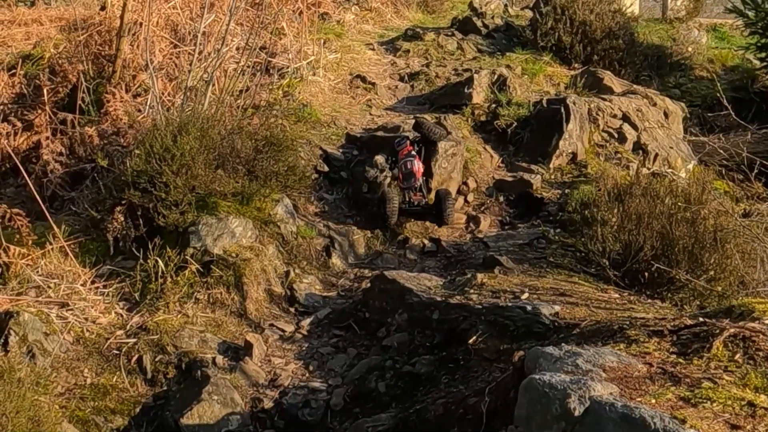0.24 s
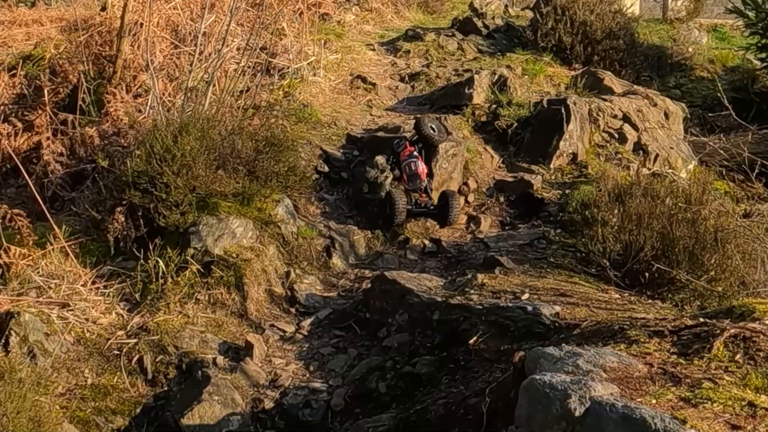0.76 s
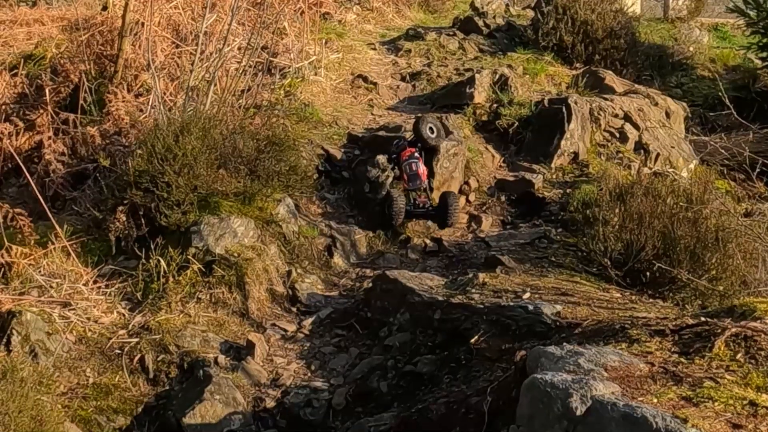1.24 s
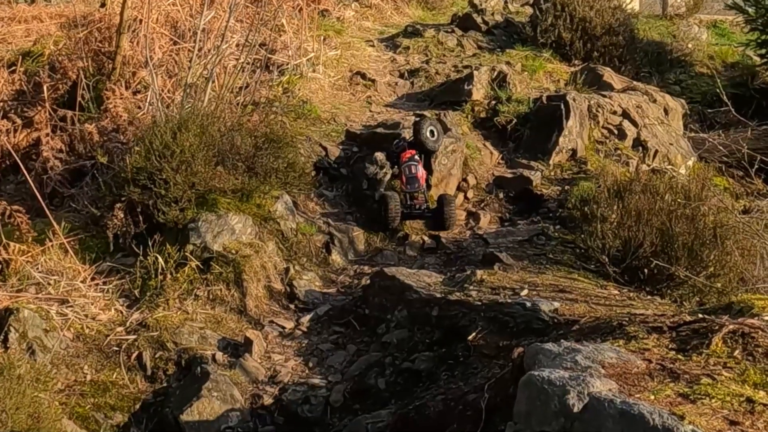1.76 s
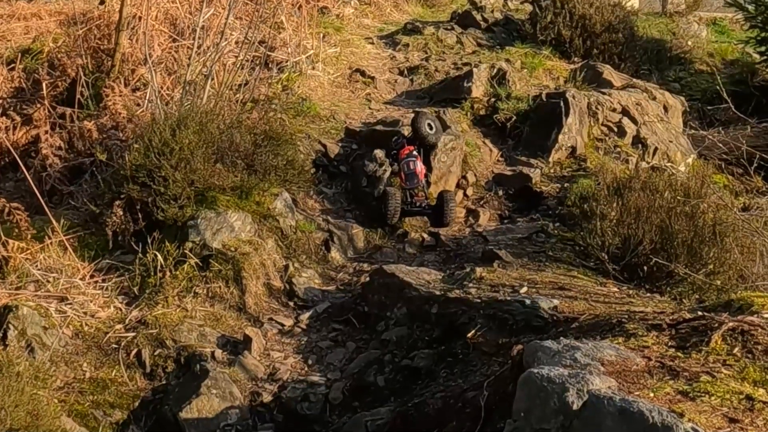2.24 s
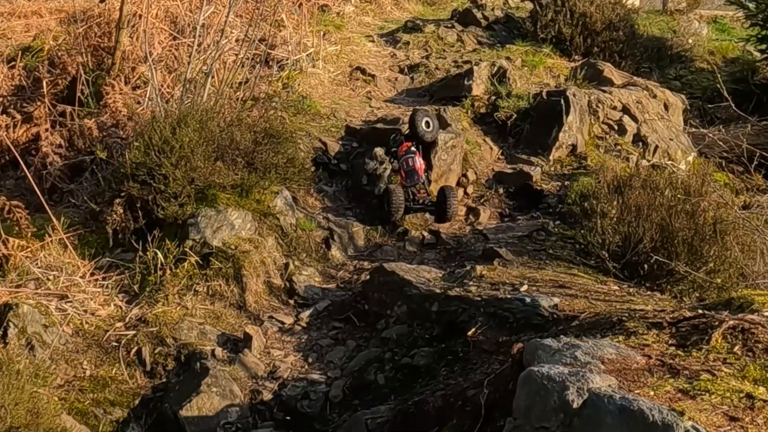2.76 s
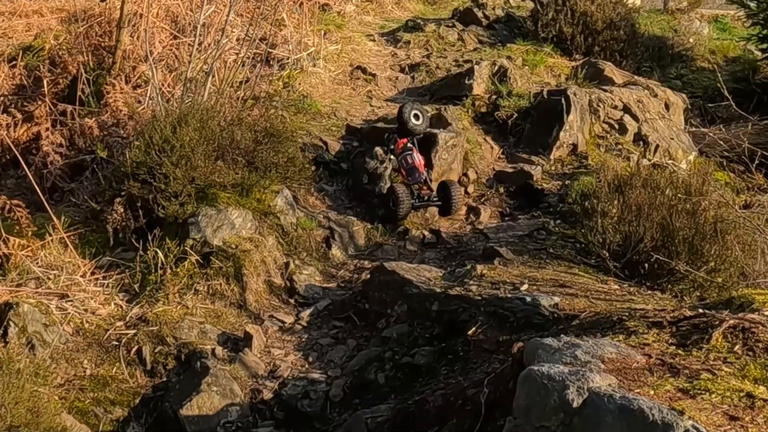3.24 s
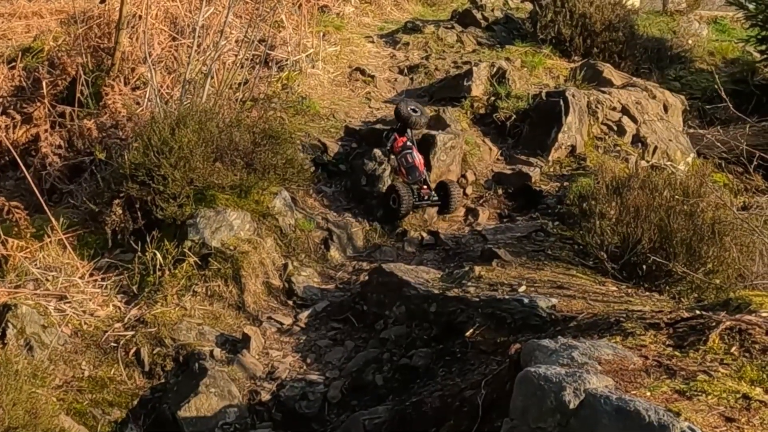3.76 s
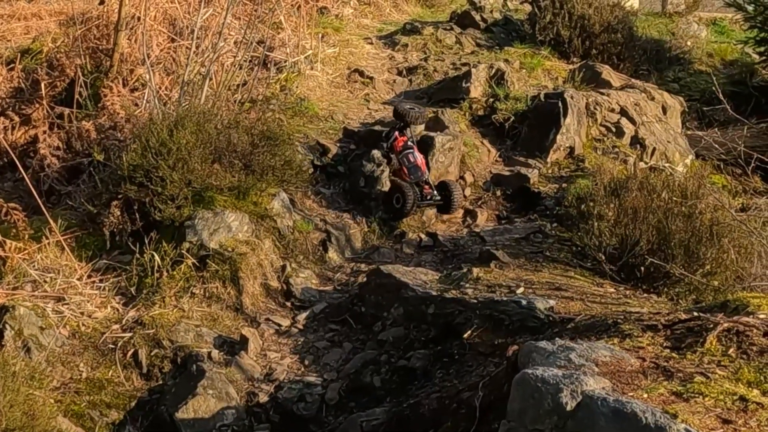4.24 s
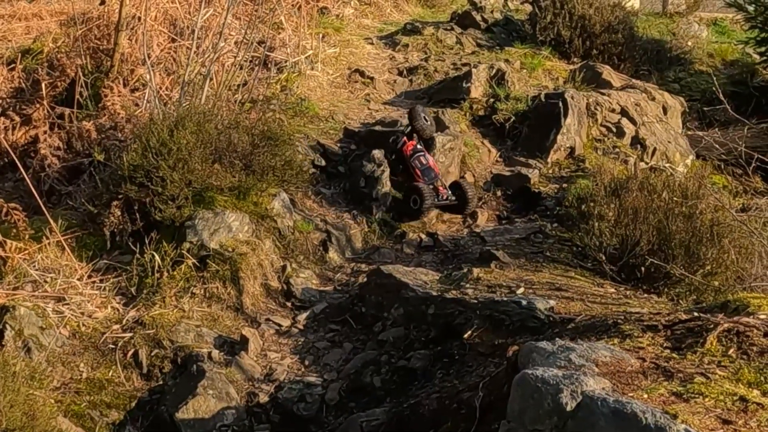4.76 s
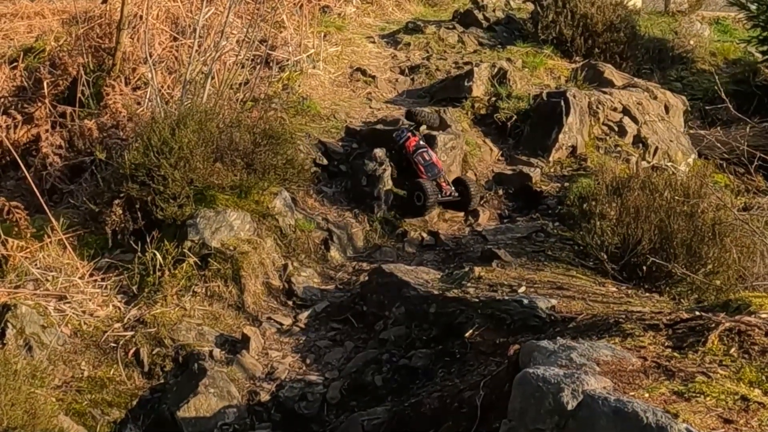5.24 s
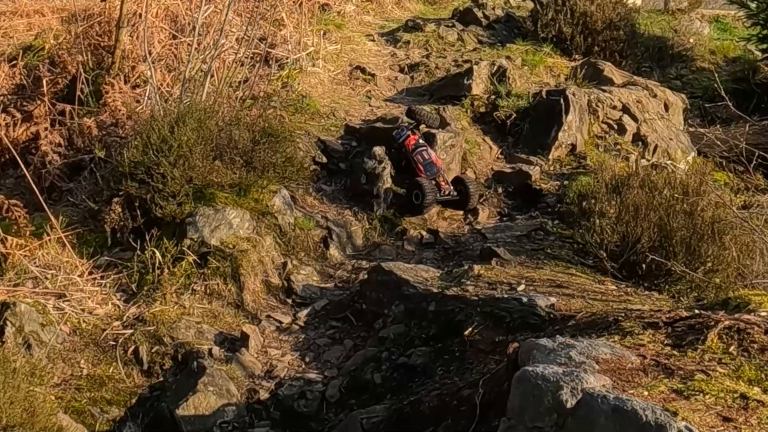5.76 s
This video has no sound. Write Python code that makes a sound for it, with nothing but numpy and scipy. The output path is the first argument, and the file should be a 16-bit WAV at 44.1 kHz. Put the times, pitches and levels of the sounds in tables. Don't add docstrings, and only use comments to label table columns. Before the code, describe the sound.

A toy electric crawler grinds and whines in short bursts over rocks, tyres clicking and thumping, with small birds whistling and wind buffeting.

```python
import sys
import numpy as np
from scipy import signal
from scipy.fft import rfft, irfft, next_fast_len
from scipy.io import wavfile
from scipy.ndimage import uniform_filter1d, map_coordinates

SR = 44100
rng = np.random.default_rng(int(sys.argv[2]) if len(sys.argv) > 2 else 0)


def transcribe(u):
    v = np.clip(np.atleast_2d(u).T, -1, 1)
    q = np.round(v * 32767).astype(np.int16)
    wavfile.write(sys.argv[1], SR, q)


def volts(x):
    e = np.asarray(x, float) / 20
    return 10 ** e


N = 264732


def unit(x):
    return x / np.sqrt(np.mean(x ** 2) + 1e-20)


def along(points, hz):
    f, v = np.transpose(points)
    return np.interp(np.log(hz + 1), np.log(f + 1), v)


def curves(rows):
    s, *cols = np.transpose(sorted(rows))
    return [np.interp(np.arange(N) / SR, s, c) for c in cols]


def bursts(tables, edge):
    t = np.arange(N) / SR
    gates = [np.clip(np.minimum(t - rows[0][0], rows[-1][0] - t) / edge + 1, 0, 1) for rows in tables]
    return np.max(gates, 0), *curves([tuple(row) for rows in tables for row in rows])


def wobble(rate):
    return map_coordinates(rng.standard_normal(int(N * rate / SR) + 4), [np.arange(N) * rate / SR])


def filtered(x, response):
    m = next_fast_len(N + SR // 2)
    return irfft(rfft(x, m) * response(np.fft.rfftfreq(m, 1 / SR)), m)[..., :N]


def noise(spectrum, channels=1):
    return unit(filtered(rng.standard_normal((channels, N)), lambda hz: volts(along(spectrum, hz))))


def spread(spectrum, side_db):
    mid, side = noise(spectrum, channels=2)
    return np.array([mid + volts(side_db) * side, mid - volts(side_db) * side])


def resonant(modes):
    def response(f):
        total = 0
        for k, (centre, width, db) in enumerate(modes):
            loss = 1j * f * width
            total = total + (-1) ** k * volts(db) * loss / (centre * centre - f * f + loss)
        return total
    return response


def turning(hz):
    return 2 * np.pi * np.cumsum(hz) / SR


def swells(rows, rise, fall, base_db):
    s, hold, db, climb_db = np.transpose(rows)[..., None]
    t = np.arange(0, N / SR + .001, .001)
    flanks = rise * np.maximum(s - t, 0) + fall * np.maximum(t - s - hold, 0)
    climb = climb_db * np.clip(1 - (t - s) / hold, 0, 1)
    power = volts(2 * (db - climb - flanks)).sum(0)
    return 10 * np.log10(volts(2 * base_db) + np.interp(np.arange(N) / SR, t, power))


# frequency in Hz, level in dB per Hz.
FAR = [(53, -26), (90, -21), (140, 1), (205, 5), (339, -3.5), (790, -5.5), (1360, 1.5), (3570, -21),
       (4820, -22.5), (6390, -23.5), (9000, -41), (11000, -33), (14300, -58), (22000, -120)]
# time in seconds, change in dB.
FAR_DRIFT = [(0, 0), (1, 1), (2, 0), (2.7, 0), (3.5, -0.5), (4.3, 0), (5.1, 0), (5.8, -1.5), (6, 2)]
FAR_DB, FAR_SWAY_DB = -59.5, 1.1


def far_hum():
    level_db = FAR_DB + curves(FAR_DRIFT)[0] + FAR_SWAY_DB * wobble(5.21)
    return volts(level_db) * spread(FAR, side_db=-5.0)


# frequency in Hz, level in dB per Hz.
BUFFET = [(12, -5), (25, -0.5), (45, -4), (70, -18.5), (100, -36), (160, -28), (300, -46), (500, -120)]
# frequency in Hz, level in dB per Hz.
FLAP = [(30, 0.5), (60, 7), (90, 7), (140, -3.5), (250, -20), (500, -120)]
# time in seconds, level in dB.
BREEZE = [(0, -42), (.33, -59.5), (.6, -51), (1.05, -59.5), (1.74, -60), (2.1, -49.5), (3.3, -49.5),
          (3.46, -75), (3.8, -38.5), (4.23, -58.5), (4.46, -56.5), (5.0, -40.5), (5.6, -38), (6, -48)]
# start in seconds, hold in seconds, level in dB.
PUFFS = [(0, 0.039, -35), (0.429, 0.014, -39), (0.537, 0.043, -40.5), (0.797, .03, -39.5),
         (1.793, 0.068, -51), (2.08, 0.034, -44.5), (2.443, 0.02355, -41), (2.566, 0.012, -49),
         (2.694, 0.049, -47), (3.023, 0.071, -45.5), (3.38, 0.029, -45.5), (3.569, 0.029, -41.5),
         (3.718, 0.2, -35), (4.33, .03, -52), (4.701, 0.047, -42), (4.96, 0.046, -36.5),
         (5.282, 0.058, -54), (5.495, 0.018, -34), (5.694, 0.082, -35), (5.838, 0.059, -37.5),
         (5.969, 0.027, -40)]
PUFF_RISE_DB_PER_S, PUFF_FALL_DB_PER_S = 224, 226


def wind():
    puffs = [(*row, 0) for row in PUFFS]
    gust_db = swells(puffs, PUFF_RISE_DB_PER_S, PUFF_FALL_DB_PER_S, curves(BREEZE)[0])
    lumps = unit(volts(2.6 * wobble(35)))
    slow = volts(gust_db) * spread(BUFFET, side_db=-6.5)
    fast = volts(1.95 * (gust_db + 39.5) - 49 + 1.8 * wobble(24.95)) * spread(FLAP, side_db=-17)
    push = lumps * (slow + fast)
    top = volts(gust_db + 8)
    rounded = push / (1 + (push / top) ** 2) ** .5
    push = filtered(rounded, lambda hz: 1 / (1 + (hz / 190) ** 6))
    return push * volts([[-1.9], [1.5]])


# frequency in Hz, level in dB per Hz.
HAZE = [(3800, -30), (4800, -4), (6000, 0), (7200, -4), (8300, -30), (22000, -120)]
# start in seconds, hold in seconds, level in dB, climb in dB.
CHATTER = [
    (.92, .15, -76, 0),
    (1.56, .35, -72, 0),
    (2.45, .3, -73, 0),
    (2.8, .4, -72, 0),
]


def flock():
    return volts(swells(CHATTER, 120, 70, -120) + 2.5 * wobble(25)) * spread(HAZE, side_db=-6)


# start in seconds, length in seconds, start pitch in Hz, end pitch in Hz, level in dB.
BIRDS = [(.11, .05, 3750, 3700, -80), (.39, .02, 5200, 2500, -73), (.92, .05, 5000, 5000, -74),
         (.98, .08, 5600, 5550, -76), (1.03, .09, 4750, 4700, -68), (1.34, .035, 3800, 5800, -73),
         (1.39, .02, 4700, 2800, -70), (1.555, .025, 6800, 6300, -64), (1.585, .025, 6300, 7300, -66),
         (1.635, .025, 7300, 6000, -65), (1.655, .042, 5100, 3300, -60), (1.695, .09, 6700, 6950, -79),
         (1.79, .1, 7000, 7150, -76), (1.81, .035, 7700, 8200, -76), (1.793, .015, 4200, 7000, -72),
         (2.4, .12, 5200, 5100, -68), (2.5, .12, 5600, 5500, -67), (2.525, .16, 4850, 4740, -68),
         (2.67, .15, 4800, 4600, -70), (.485, .03, 7900, 8500, -80), (2.47, .3, 5150, 5020, -72),
         (2.815, .12, 5900, 5550, -73), (2.93, .21, 5500, 4250, -66), (2.95, .12, 5500, 4500, -70),
         (2.85, .09, 4170, 4150, -85), (2.89, .14, 2920, 2880, -80), (4.2, .06, 2900, 2900, -76),
         (4.35, .035, 6500, 6550, -77)]
GLIDE_S = .03


def birds():
    out = np.zeros((2, N + SR))
    tremble, flutter = wobble(220), wobble(90)
    for s, length, from_hz, to_hz, db in BIRDS:
        t = np.arange(round(length * SR)) / SR
        at = round(s * SR)
        glide = to_hz + (from_hz - to_hz) * np.exp(-t / GLIDE_S)
        hz = glide * (1 + .012 * tremble[at:][:len(t)])
        level_db = db + 3 - 7 * t / length + 3 * flutter[at:][:len(t)]
        shape = np.sin(np.pi * t / length) ** .5 * volts(level_db)
        deep = int(length > .11)
        out[deep, at:][:len(t)] += shape * np.sin(turning(hz))
    return out[:, :N]


# frequency in Hz, level in dB.
ROCKS = [(150, 0), (350, -18), (1000, 1), (3500, 2), (9000, 4.5), (13000, 3)]


def echoes(x, t60):
    t = np.arange(SR // 2) / SR
    tail = rng.standard_normal((2, len(t))) * volts(-60 * t / t60) * (t > .004)
    wet = signal.fftconvolve(x[None], tail / np.linalg.norm(tail[0]), axes=1)[:, :N]
    return filtered(wet, lambda hz: volts(along(ROCKS, hz)))


# frequency in Hz, width in Hz, level in dB.
PLATE = [(1404, 130, 7.5), (2330, 430, -0.5), (4090, 370, 5.5), (5000, 800, -10), (6250, 180, -20.5)]
# start in seconds, hold in seconds, level in dB, climb in dB.
SCRAPES = [(.008, 0.032, -49, 0), (.05, 0.027, -55, 9), (.24, .05, -58.5, 1.5), (.322, 0.0099, -52.5, -2),
           (1.225, 0.037, -53.5, -4.5), (1.283, 0.015, -46, 4), (1.452, 0.08, -53, 1),
           (1.565, 0.048, -58, -9), (2.142, 0.023, -46.5, 5), (2.185, 0.011, -57, 1.5),
           (2.388, .01, -57, -1), (5.36, .1, -56, -5.5)]
SCRAPE_EDGE_DB_PER_S = 902


def scrapes():
    grit = volts(4 * wobble(900) + 1.5 * wobble(120)) * rng.standard_normal(N)
    level_db = swells(SCRAPES, SCRAPE_EDGE_DB_PER_S, SCRAPE_EDGE_DB_PER_S, -120)
    return volts(level_db) * unit(filtered(grit, resonant(PLATE)))


# frequency in Hz, width in Hz, level in dB.
SHELL = [(165.5, 64, -8.5), (238, 28.3, -5), (370.6, 63, -2), (710, 5.4, -9)]
# start in seconds, peak in dB, ring in Hz, shell knock in dB, crack in dB.
CLICKS = [(0.162, -28, 3830, -26, -24), (0.16, -41, 5900, -20, -18), (0.38, -45, 6300, -20, -12),
          (0.9798, -36.5, 2100, -9, -10), (1.0516, -38, 4770, -12, -13), (1.37, -43.5, 6000, -15, -4),
          (1.4, -42, 4000, -24, -10), (2.3881, -31, 4900, -33, -6), (2.755, -38.5, 3100, -5, -13),
          (2.8922, -37.5, 2800, -9, -15), (3.0734, -34, 1720, 15, -14), (3.187, -33.5, 2300, 5, -25),
          (3.232, -35, 2900, -16, -14), (3.263, -31, 2040, -6, -21), (3.3356, -37.5, 2600, 10, -26),
          (3.5597, -52, 7450, -10, 5), (3.8432, -48, 6940, 20, -21), (4.2082, -49, 2900, 13, -23),
          (4.433, -38, 3700, -6, -22), (4.262, -23.5, 2070, 5.5, -12.5), (4.304, -35, 1750, -7, -12),
          (5.14, -37, 4000, -22, -5), (4.912, -43, 6000, -19, -3), (5.872, -52, 9500, -19, -2),
          (3.59, -50, 9000, -19, 0), (3.603, -50, 11000, -19, 0), (1.305, -44, 5000, -15, -10),
          (0.398, -50, 9000, -19, 0), (0.5, -51, 9000, -19, 0), (5.954, -35.5, 1761, 19, -27)]
RING_T60_S, CRACK_T60_S = .006, .013


def clicks():
    out, knocks = np.zeros(N + SR), np.zeros(N)
    t = np.arange(SR // 20) / SR
    for s, db, hz, knock_db, crack_db in CLICKS:
        at = round(s * SR)
        rise = .0004 * volts(.9 * (-20 - db))
        grains = uniform_filter1d(rng.standard_normal(len(t)), size=3)
        crack = volts(crack_db + 6.5 - 60 * t / CRACK_T60_S) * grains
        low_mode = (0.42 + (hz < 3100)) * np.sin(2 * np.pi * 1430 * t)
        ring = volts(-60 * t / RING_T60_S) * (np.sin(2 * np.pi * hz * t) + low_mode)
        out[at:][:len(t)] += volts(db + 0.5) * (crack + ring) * (1 - np.exp(-t / rise))
        knocks[at] = volts(db + knock_db + 29.0)
    narrow_shell = [(c, 0.57 * w, db) for c, w, db in SHELL]
    return out[:N] + filtered(knocks, resonant(narrow_shell))


# time in seconds, peak in dB.
THUMPS = [(0.298, -44), (0.298, -37), (1.086, -45), (1.119, -41), (1.182, -50), (1.183, -37), (1.216, -24),
          (1.462, -36.5), (1.535, -33), (1.62, -37.5), (1.872, -37), (1.93, -34), (1.954, -22),
          (2.839, -41.5), (2.903, -51), (3.075, -47), (3.161, -40), (3.338, -55), (3.837, -43),
          (4.241, -43), (4.264, -33), (4.499, -43), (4.54, -43), (4.557, -36), (4.639, -29), (4.683, -25.5),
          (4.727, -34), (4.727, -31), (4.97, -39), (5.021, -29.5), (5.174, -42), (5.197, -33),
          (5.247, -24.5), (5.292, -23.5), (5.402, -21), (5.438, -28), (5.478, -25), (5.532, -21),
          (5.625, -33), (5.628, -28), (5.654, -28), (5.697, -31.5), (5.866, -40), (5.923, -28.5),
          (5.954, -25)]
THUMP_DB = 42


def thumps():
    at = [round(s * SR) for s, db in THUMPS]
    jolts = np.bincount(at, [volts(db + THUMP_DB) for s, db in THUMPS], N)
    return filtered(jolts, lambda f: resonant(SHELL)(f) / (1 + 1j * f / 700) ** 2)


# frequency in Hz, level in dB.
HOUSING = [(2500, -20.5), (3700, -5), (4300, -20.5), (5000, -1.5), (7700, 0.5), (8600, -10.5),
           (9400, -11.5), (11200, -2.5), (12000, -17)]
# frequency in Hz, level in dB per Hz.
HISS = [(1760, -26), (3000, -3.5), (3950, 0.5), (4390, 1.5), (5040, 1.5), (6770, 5), (7620, 6.5),
        (8740, -9), (11100, 4.5), (13400, -6), (14400, -25)]
# time in seconds, mesh in Hz, whine in dB.
FLICKS = [
    [(0.553, 1018, -72), (0.566, 1228, -51), (0.588, 1935, -53), (0.63, 2010, -83)],
    [(2.315, 940.3, -61), (2.334, 1335, -53), (2.366, 2010, -48), (2.38, 1934, -51), (2.432, 1834, -82)],
    [(2.44, 1960, -85), (2.52, 1840, -83)],
    [(3.806, 1407, -83), (3.83, 1400, -74)],
    [(4.528, 1800, -85), (4.55, 1798, -85)],
    [(4.94, 1510, -63), (4.98, 1730, -93)],
    [(5.01, 1700, -85.5), (5.048, 1669, -91)],
    [(5.112, 1298, -90), (5.125, 1311, -90)],
    [(5.15, 1284, -81), (5.2, 1624, -78)],
    [(5.232, 1698, -70), (5.245, 1776, -57), (5.27, 1859, -46.5), (5.285, 1815, -49), (5.302, 1533, -59),
     (5.32, 1543, -61)],
    [(5.52, 1499, -90), (5.532, 1502, -90)],
]
# time in seconds, mesh in Hz, whine in dB.
SWEEPS = [
    [(3.593, 1457, -76), (3.615, 1510, -55), (3.634, 1800, -52), (3.646, 1787, -44), (3.684, 1890, -49.5),
     (3.72, 1820, -42), (3.758, 1556, -48.5), (3.78, 1184, -49.5), (3.794, 1025, -56)],
    [(3.845, 902, -55.5), (3.865, 1132, -52.5), (3.888, 1155, -52.5), (3.914, 1357, -48.5),
     (3.942, 1420, -47), (4.012, 1363, -50.5), (4.039, 1113, -53), (4.075, 965, -62)],
]
# time in seconds, mesh in Hz, whine in dB.
PUSHES = [
    [(0.66, 1845, -72), (0.686, 2022, -46), (0.724, 1978, -39.5), (0.756, 1840, -47), (0.79, 1624, -42),
     (0.806, 1510, -43), (0.816, 1406, -47)],
    [(0.821, 1314, -44), (0.838, 1316, -51), (0.845, 1097, -45), (0.856, 1110, -50), (0.864, 1033, -54),
     (0.885, 1120, -50), (0.902, 960, -59), (0.912, 987, -61)],
    [(2.03, 1034, -53), (2.053, 1110, -54), (2.07, 1062, -51.5), (2.097, 1328, -49.5), (2.11, 1230, -50),
     (2.138, 1330, -49), (2.178, 1175, -52), (2.207, 1135, -54), (2.228, 1125, -54)],
    [(4.575, 1922, -70), (4.59, 1984, -51), (4.618, 1968, -47.5), (4.66, 1795, -51), (4.672, 1792, -51),
     (4.682, 1658, -48), (4.7, 1626, -49)],
    [(4.71, 1420, -51), (4.734, 1430, -55), (4.766, 1293, -54), (4.816, 1413, -53.5), (4.83, 1260, -54),
     (4.85, 1220, -52), (4.885, 1250, -62)],
]
BRUSH_DB = [-48.5, -47.5, -57, -54, -64, -47.5, -50.5, -60, -49, -48, -49, -51.5, -56, -52.5, -53, -52, -47,
            -48, -49]
BRIGHT_DB = [-5, 2.5, -3, -3, 0, 1, -4.5, -4, -3, -2.5, 0, 2, -1.8, -9, -9, -4, 3, -1.5]
SWING = [.1, .1, .1, .1, .1, .1, .1, .1, .1, .1, .1, .17, .13, .06, .12, .12, .06, .12]
FOLD_HZ = 24000
PINION_TEETH = 7.7
BRUSH_DB_PER_OCTAVE, SPUTTER_DB = 7, 1.8


def servo():
    settings = zip(FLICKS + SWEEPS + PUSHES, BRUSH_DB, BRIGHT_DB, SWING)
    moves = [[(s, hz, db, brush_db, rows in PUSHES, bright_db, swing) for s, hz, db in rows]
             for rows, brush_db, bright_db, swing in settings]
    gate, hz, tone_db, brush_db, wedged, bright_db, swing = bursts(moves, edge=0.022)
    hiss_db = brush_db + BRUSH_DB_PER_OCTAVE * np.log2(hz / 2000)
    load = np.clip(2000 / hz - 1, 0, 1)
    jitter = (.002 + .006 * load) * wobble(200)
    strain = load * wedged * (.012 * wobble(250) + .005 * wobble(60))
    hz = uniform_filter1d(hz, size=220) * (1 + jitter + strain)
    phase, fold = turning(hz), turning(np.full(N, FOLD_HZ))
    phase = phase + swing * np.sin(phase / PINION_TEETH)
    comb = 0
    for k in range(2, 14):
        tone_hz = k * hz
        colour_db = along(HOUSING, tone_hz) + bright_db * np.log2(tone_hz / 6000)
        loss_db = 10 * load * (k < 4) + 12 * wedged * np.clip(4 * load - 1.6, 0, 1) * (tone_hz < 4250)
        flicker_db = (1.8 + 2.5 * load * wedged) * wobble(80)
        size = volts(colour_db - loss_db + flicker_db) * (tone_hz < FOLD_HZ / 2)
        mirror = volts(-5 - ((FOLD_HZ / 2 - tone_hz) / 480) ** 2)
        comb = comb + size * (np.sin(k * phase + k * k) + mirror * np.sin(fold - k * phase))
    hiss = volts(1.5 * wobble(230) + SPUTTER_DB * wobble(30)) * noise(HISS)[0]
    return gate ** 2 * (volts(tone_db) * comb + volts(hiss_db - 4.0) * unit(hiss))


# start in seconds, hold in seconds, shell rumble at the end in dB,
# climb over the hold in dB, gear grind over rumble in dB.
PULLS = [(0, 0.034, -48.5, 26, -2.5), (0.262, 0.076, -39.5, 11, -16.5), (0.652, 0.13, -79.5, -15, 10.5),
         (1.123, 0.1, -33, 9.5, -16.5), (1.308, 0.017, -48, 10, -7.5), (1.371, 0.25, -37, 24, -15.5),
         (1.868, 0.13, -31.5, 9.5, -15.5), (2.069, 0.15, -56.5, 3, -13), (2.156, 0.042, -64, 10, 7),
         (2.379, 0.063, -75, -6, 10.5), (2.722, 0.2, -53, 6, -16.5), (3.072, 0.0092, -44.5, 10, -12),
         (3.114, 0.22, -50.5, -2, -12.5), (3.613, 0.15, -55.5, 4, -7.5), (3.838, 0.025, -46.5, 11, -20),
         (3.916, 0.119, -61.5, 5, -7.5), (4.276, 0.085, -53, -14.5, -14), (4.39, 0.077, -62.5, -7, -25),
         (4.554, 0.29, -30, 8, -23), (4.947, 0.058, -41.5, 4.5, -17.5), (5.239, 0.43, -34, -4.5, -20.5),
         (5.658, 0.014, -33, 13, -44), (5.9, 0.085, -27.5, 14.5, -24)]
# time in seconds, mesh in Hz.
DRIVE = [
    [(0.25, 700), (0.3, 655.5), (0.36, 687)],
    [(1.1, 529), (1.146, 680), (1.18, 734), (1.21, 826), (1.26, 793)],
    [(1.45, 490), (1.48, 555), (1.52, 555), (1.562, 480), (1.59, 485)],
    [(1.87, 600.4), (1.9, 680), (1.924, 800.6), (1.945, 829), (1.969, 999), (1.987, 776), (2.012, 775),
     (2.03, 630)],
    [(4.61, 652), (4.628, 630.9), (4.668, 699), (4.72, 555), (4.81, 717), (4.864, 574.6), (4.88, 495.3)],
    [(4.94, 794), (4.98, 983), (5.0, 738), (5.04, 673)],
    [(5.21, 607.5), (5.236, 746.4), (5.26, 914), (5.285, 928), (5.305, 811), (5.35, 823), (5.4, 1033),
     (5.44, 936)],
    [(5.46, 847), (5.486, 757), (5.54, 929), (5.578, 884), (5.608, 749), (5.69, 719)],
    [(5.9, 698), (5.968, 841), (5.984, 758), (6.0, 760)],
]
SING_DB = [-1, 1, 2, 1, -4.5, -6, -2.5, -2.5, -5]
# frequency in Hz, level in dB per Hz.
GRIND = [(290, -56), (500, -10), (1020, 2), (1180, -7), (1580, -0.5), (2070, -6), (2350, -5), (3480, -11.5),
         (5160, -10), (11000, -30), (14400, -31.5)]
# multiple of the mesh frequency, level in dB.
TEETH = [(1, -8), (2, 1.5), (3, -1.5), (4, -8), (5, -9), (6, -8), (7, -15), (8, -16)]
# frequency in Hz, level in dB.
GEARBOX = [(950, -6), (1450, 4), (1700, 1), (1950, -6), (2400, 2), (3000, 0), (3350, -4), (3800, 3),
           (4500, -1), (6000, -6)]
SPIN_UP_DB_PER_S, COAST_DB_PER_S, IDLE_DB, IDLE_GRIND_DB = 251, 294, -82, -93
MESH_DB, MESH_EDGE_S = 2.5, .011


def drive():
    rumbles = [row[:4] for row in PULLS]
    grinds = [(s, hold, db + over, climb / 2) for s, hold, db, climb, over in PULLS]
    rumble_db = swells(rumbles, SPIN_UP_DB_PER_S, COAST_DB_PER_S, IDLE_DB)
    grind_db = swells(grinds, SPIN_UP_DB_PER_S, COAST_DB_PER_S, IDLE_GRIND_DB)
    pulls = [[(*row, db) for row in rows] for rows, db in zip(DRIVE, SING_DB)]
    gate, hz, sing_db = bursts(pulls, edge=MESH_EDGE_S)
    lurch = wobble(45)
    blows = volts(2.28 * lurch + 1.27 * wobble(200)) * rng.standard_normal(N)
    shell = filtered(blows, lambda f: resonant(SHELL)(f) * f ** 4 / (f ** 4 + 115 ** 4) / (1 + (f / 900) ** 2))
    grit = volts(1.1 * lurch + 2 * wobble(400)) * noise(GRIND)[0]
    phase = turning(uniform_filter1d(hz, size=500) * (1 + .011 * wobble(160)))
    mesh = 0
    for k, db in TEETH:
        tooth_db = db + along(GEARBOX, k * hz) + 3.4 * wobble(45) + 1.5 * lurch
        mesh = mesh + volts(tooth_db) * np.sin(k * phase)
    grit = grit * (1 + .7 * gate * np.cos(phase)) * (1 + .25 * gate * np.cos(phase / PINION_TEETH))
    singing = gate * volts(grind_db + MESH_DB + sing_db) * mesh
    return volts(rumble_db - 4.5) * unit(shell) + volts(grind_db + 3) * unit(grit) + singing


# frequency in Hz, difference in dB.
LEAN = [(300, -1), (2000, -0.7), (6000, -1), (12000, 4)]


def lean(hz):
    level = volts(along(LEAN, hz) * np.array([[.5], [-.5]]))
    lag = 1.4 * np.pi * hz / SR / (1 + (hz / 5000) ** 2)
    return level * np.exp(np.array([[-1j], [1j]]) * lag)


def scene():
    crawler = drive() + thumps() + servo() + clicks() + scrapes()
    near = crawler + volts(-12.5) * echoes(crawler, t60=.14) + far_hum()
    song, deep_song = volts(8.0) * birds()
    deep_song = volts(-3) * deep_song
    direct = (song + deep_song) * volts([[.6], [-.6]])
    far = direct + echoes(volts(-9) * song + deep_song, t60=.3)
    return filtered(near + far, lean) + wind() + flock()


def band_limit(x):
    return signal.sosfilt(signal.butter(12, 14650, fs=SR, output="sos"), x)


def record(dry):
    heard = filtered(dry, lambda hz: 1 / (1 + (hz / 14000) ** 24))
    return band_limit(heard)


dry = scene()
out = record(dry)
transcribe(out)
```